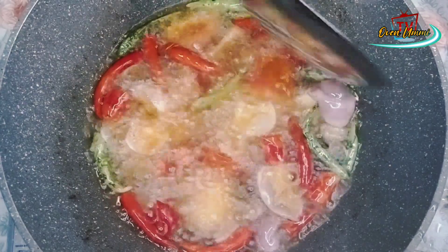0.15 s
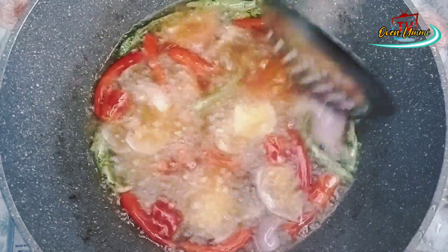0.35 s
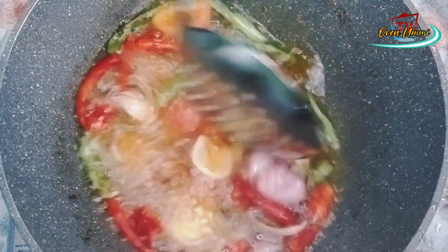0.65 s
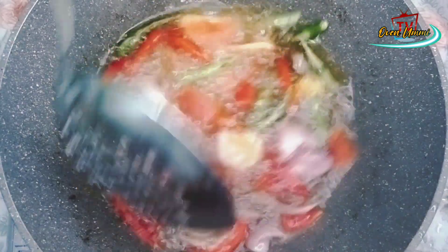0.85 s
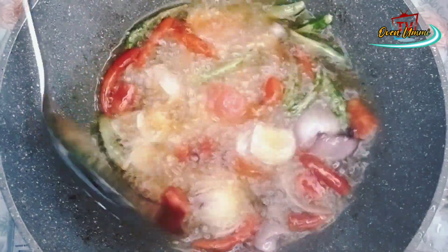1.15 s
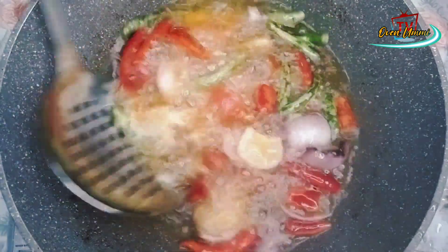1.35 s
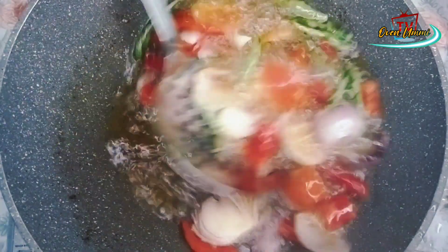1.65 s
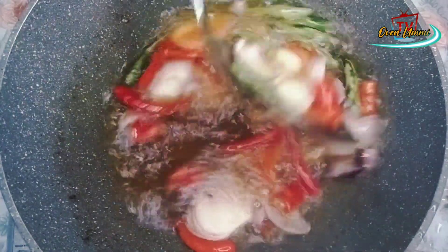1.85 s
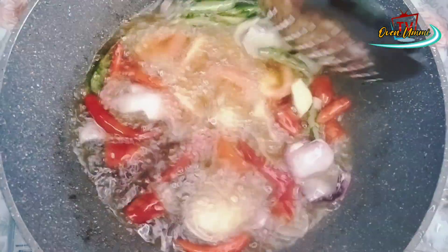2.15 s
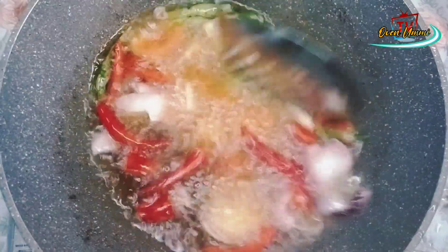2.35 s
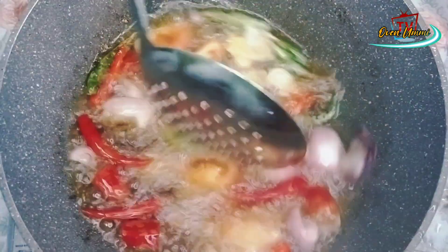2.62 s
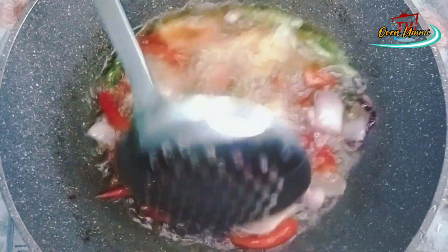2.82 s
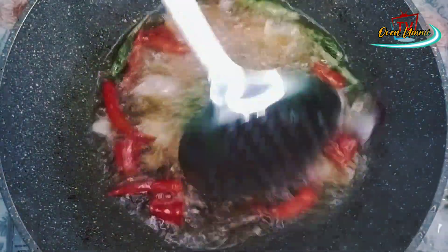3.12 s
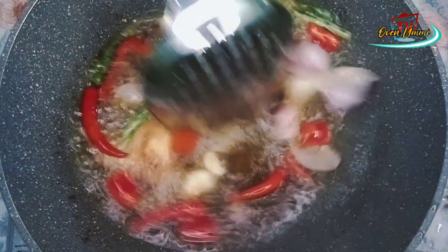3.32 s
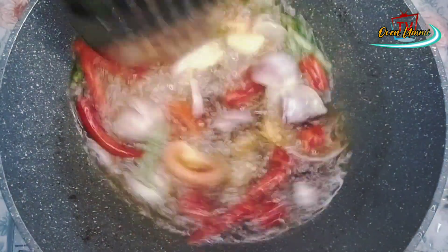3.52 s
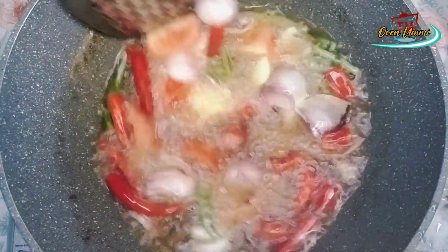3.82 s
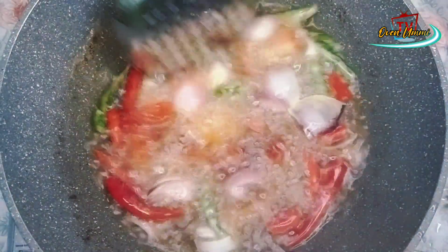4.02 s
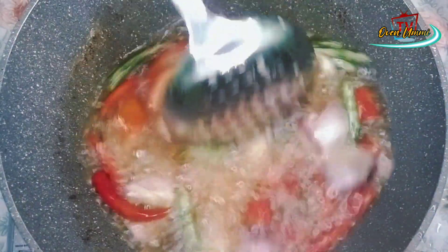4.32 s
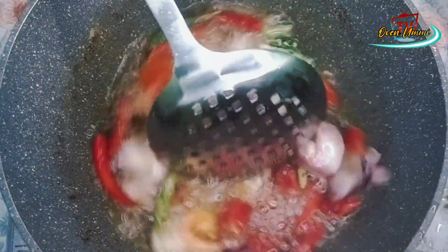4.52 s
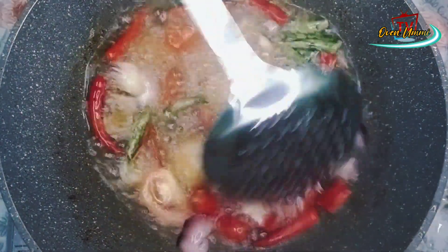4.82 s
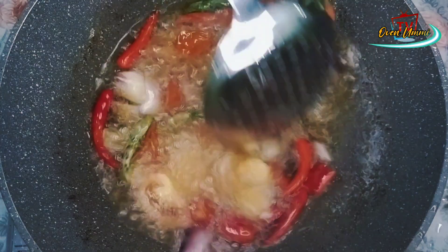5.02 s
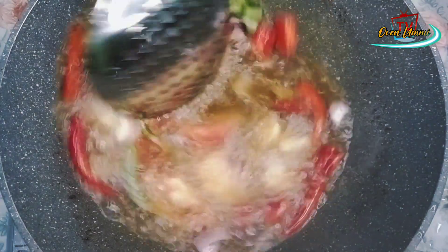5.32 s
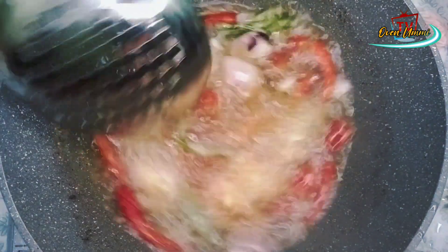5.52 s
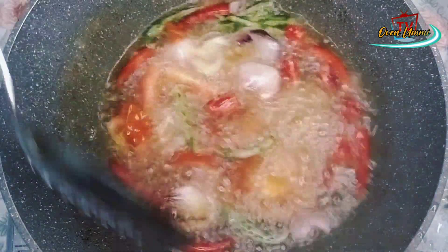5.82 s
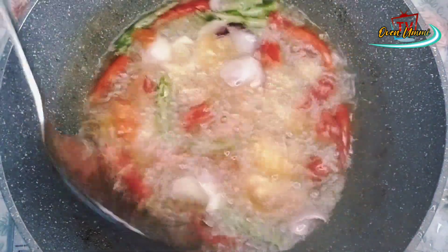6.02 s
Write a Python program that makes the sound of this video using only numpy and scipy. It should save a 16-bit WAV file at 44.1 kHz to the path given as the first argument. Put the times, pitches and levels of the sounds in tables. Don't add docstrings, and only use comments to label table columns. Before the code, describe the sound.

A phone held close over a wok hears frying oil as gated, watery crackle rather than a full steady hiss: tiny bright clicks, snappy bubble pops and lower plops, weaker in the first two seconds and denser later. A metal skimmer stirs, tapping and knocking with short dull rings, the brightest double knock just before four seconds, light tap and soft thud at the end.

```python
import sys
import numpy as np
from scipy import signal
from scipy.fft import rfft, irfft, next_fast_len
from scipy.io import wavfile
from scipy.ndimage import uniform_filter1d

SR = 44100
rng = np.random.default_rng(int(sys.argv[2]) if len(sys.argv) > 2 else 0)


def materialize(psi):
    bounded = np.clip(np.atleast_2d(psi).T, -1, 1)
    quanta = np.round(bounded * 32767).astype(np.int16)
    wavfile.write(sys.argv[1], SR, quanta)


N = 271656
FRAME, HOP = 768, 192
HELD_DOWN_DB = 23


def from_db(db):
    return 10 ** (np.asarray(db) / 20)


def rms_one(x):
    return x / np.sqrt(np.mean(x ** 2) + 1e-20)


def resonances(x, modes):
    out = 0
    for k, (hz, width, db) in enumerate(modes):
        r = np.exp(-np.pi * width / SR)
        poles = [1, -2 * r * np.cos(2 * np.pi * hz / SR), r * r]
        out = out + (-1) ** k * from_db(db) * signal.lfilter([1 - r, 0, r - 1], poles, x)
    return out


# f/Hz, density level/dB
STEADY_SPECTRUM = [(24, -54.5), (50, -33), (100, -20), (159, -2.5), (256, -7), (412, -9.5), (697, -1.5),
                   (1090, -5.5), (1500, -1.5), (2800, -12.5), (4340, -12), (7930, -9), (12000, -19.5),
                   (15600, -12.5)]


def steady_gain(hz):
    corner_hz, corner_db = np.array(STEADY_SPECTRUM).T

    def shape(f):
        return from_db(np.interp(np.log(f + 1), np.log(corner_hz), corner_db))

    whole = np.sqrt(np.mean(shape(np.linspace(0, SR / 2, 4000)) ** 2))
    steady_db = -67.5
    return shape(hz) / whole * from_db(steady_db + HELD_DOWN_DB + 0.5)


ECHO_PATHS = [.0113, .0149, .0191, .0237, .0293, .0371]


def kitchen(x):
    echo_db, t60_s = -17, 0.35
    size = next_fast_len(N + SR)
    turn = -2j * np.pi * np.fft.rfftfreq(size, 1 / SR)
    loops = [from_db(-60 * lag / t60_s) * np.exp(turn * lag) for lag in ECHO_PATHS]
    echoes = sum(g / (1 - g) for g in loops)
    return x + from_db(echo_db) * irfft(rfft(x, size) * echoes, size)[:N]


# t/s, fade/s, level/dB, f/Hz, width/Hz
SCRAPE_STROKE = (4, 0.47, -46.5, 1389, 277)


def scrape():
    s, fade, db, hz, width = SCRAPE_STROKE
    t = np.maximum(np.arange(N) / SR - s, 0)
    rub = rms_one(resonances(rng.standard_normal(N), [(hz, width, 0)]))
    return from_db(db) * rub * (t > 0) * np.exp(-(t / fade) ** 2)


# f/Hz, width/Hz, level/dB
ROOM_MODES = [(95.7, 8.3, 1.5), (151.8, 19, 2.5), (198, 46, -3.5)]
# f/Hz, width/Hz, level/dB
PAN_MODES = [(326, 58, -8), (520, 133, 1), (800, 146, 3), (1279, 500, -3), (1974, 270, -10)]
# t/s, ring level/dB, thud over ring/dB, boom over ring/dB, hardness/dB per octave
KNOCKS_ON_PAN = [
    (0.343, -36, 15, -2, 1.64),
    (1.252, -36.5, 22.5, -6, -3),
    (2.96, -43, 22, -2.5, -5.5),
    (3.818, -35.5, 1, -7.5, 3.5),
    (3.981, -38.5, 3, -0.5, -2),
    (5.911, -43.5, -1, 1, -0.5),
    (6.12, -43, 24, 1.5, -2.1),
]


def knocks():
    out, t = np.zeros(N + SR), np.arange(SR // 2) / SR
    bright = signal.butter(2, [1500, 3800], "band", fs=SR, output="sos")
    for s, db, thud_db, boom_db, hardness in KNOCKS_ON_PAN:
        air = rng.standard_normal((3, len(t)))
        struck = [(f, width, level + hardness * np.log2(f / 500)) for f, width, level in PAN_MODES]
        thud_hz = 562 - 8 * hardness
        thud = np.sin(2 * np.pi * thud_hz * t) * np.exp(-((t - 0.0025) / 0.0016) ** 2)
        ring_decay = 5.9 * np.exp(-t / 0.0053) + from_db(-60 * t / 0.88)
        ring = rms_one(resonances(air[0], struck)) * ring_decay * (1 - np.exp(-t / 0.0044))
        boom = rms_one(resonances(air[1], ROOM_MODES)) * from_db(-60 * t / 0.61) * (1 - np.exp(-t / 0.004))
        clack_decay = np.exp(-t / 0.0013) + 0.28 * from_db(-60 * t / 1.0)
        clack = rms_one(signal.sosfilt(bright, air[2])) * clack_decay
        clack_db = -4.5 + 2.6 * hardness
        blow = 1.05 * from_db(thud_db) * thud + ring + from_db(boom_db) * boom + from_db(clack_db) * clack
        i = round(s * SR)
        out[i:i + len(t)] += from_db(db) * blow
    return out[:N]


# t/s, level/dB, treble/dB
FRYING_VIGOUR = [(0.0, 6.5, 1), (0.199, -5.5, 0.5), (0.439, 0, -4), (0.66, -6.5, 2), (1.101, -1, -1.5),
                 (1.6, -6, 0), (2.1, 2.5, 1), (2.42, 2.5, 0.5), (2.64, -2.5, 0), (2.86, 3.5, 1),
                 (3.3, 5.5, -1.5), (3.701, 5.5, -0.5), (4.05, 5.5, 0), (4.38, 3.5, -1.5), (4.62, 5.5, 1.5),
                 (5.1, 5, 0), (5.3, 6, 0), (6.16, 8.5, -1)]


def vigour(s, column=1):
    rows = np.array(FRYING_VIGOUR)
    return np.interp(s, rows[:, 0], rows[:, column])


def crackle(per_s, spread_db):
    sizes = from_db(spread_db * np.minimum(rng.exponential(1, N), 5.0)) * rng.choice([-1, 1], N)
    return rms_one(sizes * (rng.random(N) < per_s / SR))


def bubbles(per_s, cycles):
    born = crackle(per_s, spread_db=3.0)
    dealt = rng.integers(0, 24, N)
    total = 0
    for k, hz in enumerate(np.geomspace(2200, 15000, 24)):
        excitation = born * (dealt == k) + 1e-18
        total = total + resonances(excitation, [(hz, hz / cycles, 0)]) / np.sqrt(hz)
    return rms_one(total)


FIZZ_REGIONS = [1610, 3640, 7260, 12140]
# lift/dB, share of the vigour, warming/dB per s
FIZZ_RESPONSE = [(0, 0.089, 0), (2.5, 0.18, 0.76), (0.29, .9, -0.03), (0.55, 0.94, -0.0038)]
# f/Hz, width/Hz, share of the vigour added
BOWL_MODES = [(2546, 330, 0.4), (3220, 260, -0.16), (3756, 100, 0.18), (4980, 210, 0.14),
              (5360, 400, -0.27), (5825, 43, -0.44), (8500, 860, 0.034)]


def sizzle(click_share):
    clicks = crackle(1200, spread_db=3.0)
    clicks = signal.sosfilt(signal.butter(1, 1200, "high", fs=SR, output="sos"), clicks)
    hiss = np.sqrt(1 - click_share) * rng.standard_normal(N)
    flat = hiss + np.sqrt(click_share) * clicks + from_db(-9.0) * bubbles(1600, cycles=6.0)
    hz, s, spec = signal.stft(flat, SR, nperseg=FRAME, noverlap=FRAME - HOP)
    bowl = 1 + sum(share * np.exp(-((hz - centre) / width) ** 2) for centre, width, share in BOWL_MODES)
    lift = np.array([db + follows * vigour(s) + warming * s for db, follows, warming in FIZZ_RESPONSE])
    lift[-1] += vigour(s, column=-1)
    weights = np.array([np.interp(hz, FIZZ_REGIONS, row) for row in np.eye(4)])
    lifted = spec * from_db(bowl[:, None] * (weights.T @ lift))
    return signal.istft(lifted, SR, nperseg=FRAME, noverlap=FRAME - HOP)[1][:N]


def spatter():
    count, follows = 140, 2.2
    s = np.arange(N) / SR
    share = np.cumsum(from_db(follows * vigour(s)))
    when, size, pitch, broad = rng.random((count, 4)).T
    t = np.interp(when, share / share[-1], s)
    hz = 3500 + (15510 - 3500) * pitch
    spread_hz = 79 * (900 / 79) ** broad
    return list(zip(t, 16.5 + 3 * size, hz, spread_hz))


# t/s, level over sizzle/dB, f/Hz, spread/Hz
BROAD_POPS = [(0.117, 22, 5570, 3310), (0.288, 24.5, 10100, 3040), (2.909, 17.5, 13930, 2600),
              (0.42, 31, 3160, 890), (0.69, 18.5, 10300, 2600), (0.691, 20.5, 14000, 2200),
              (0.832, 18.5, 7330, 1820), (0.915, 16.5, 13750, 1980), (1.004, 17, 11400, 2160),
              (1.005, 17.5, 15100, 1410), (1.144, 17.5, 9350, 1352), (1.253, 25, 2610, 4730),
              (1.975, 18.5, 12270, 3209), (2.019, 18.5, 7490, 2235), (2.142, 22.5, 5965, 2460),
              (2.3, 18.5, 12200, 3540), (2.338, 19, 5920, 1256), (2.377, 19, 10250, 1695),
              (2.491, 19, 9760, 2530), (2.79, 19, 7500, 1500), (2.795, 18.5, 12670, 2967),
              (3.143, 19, 12790, 5290), (3.158, 21, 4970, 2290), (3.634, 26.5, 13800, 5150),
              (3.725, 30, 5010, 880), (3.819, 23.5, 6840, 4900), (3.964, 18.5, 10700, 3160),
              (5.234, 22.5, 11770, 7350), (5.313, 23, 11570, 7500), (5.905, 24.5, 6314, 2400)]
# t/s, level over sizzle/dB, f/Hz
SINGLE_POPS = [(0.042, 20, 3350), (0.07, 23, 4840), (0.336, 26.5, 3925), (0.471, 19.5, 7820),
               (0.487, 18.5, 8270), (0.62, 19, 4500), (0.973, 18, 10300), (1.211, 20, 6470),
               (1.276, 20, 14300), (1.465, 25, 3940), (1.5, 25.5, 4060), (1.505, 22, 8150),
               (1.536, 21, 2430), (1.804, 18.5, 15000), (1.814, 22, 6980), (1.924, 23.5, 3956),
               (2.055, 20, 7560), (2.439, 27, 6810), (2.544, 19.5, 14040), (2.687, 17, 12940),
               (2.981, 19.5, 4530), (3.044, 28, 5240), (3.294, 28.5, 5040), (3.434, 31, 4570),
               (3.524, 18.5, 7400), (3.923, 33, 3190), (4.205, 25, 4488), (5.122, 26.5, 3840),
               (5.499, 33.5, 4980), (5.955, 31.5, 8060)]
# t/s, level over sizzle/dB, f/Hz
LOW_POPS = [(1.215, 18, 3230), (1.516, 23, 3330), (5.27, 27.5, 3030), (3.194, 24.5, 3635),
            (3.758, 24.5, 3435), (4.016, 27.5, 3500), (4.283, 27.5, 2760), (4.522, 21, 2670),
            (4.544, 13.5, 3650), (4.832, 22, 2425), (5.02, 22, 2630), (5.33, 27, 2580), (5.744, 20, 2716),
            (5.917, 24, 2930), (5.957, 21.5, 2035)]
# t/s, level over sizzle/dB, f/Hz
SKIMMER_TAPS = [(0.346, 30.5, 1490), (1.064, 20.5, 527), (1.253, 34.5, 1086), (1.68, 18, 492),
                (1.688, 19, 2027), (2.692, 22.5, 815), (2.692, 19.5, 1054), (3.824, 29.5, 2147),
                (4.086, 22.5, 2028), (4.166, 22.5, 1356), (4.321, 19.5, 635), (3.819, 36, 773),
                (3.981, 30, 920), (4.913, 19.5, 797), (5.353, 17.5, 660), (4.321, 17.5, 1078),
                (0.404, 21, 2074)]


def pops(decay_s, offset_db):
    length = 600
    out, t = np.zeros(N + length), np.arange(length) / SR
    bursts = list(BROAD_POPS)
    bursts += [(s, db, hz, 440) for s, db, hz in SINGLE_POPS]
    bursts += [(s, db, hz, 170) for s, db, hz in LOW_POPS]
    bursts += [(s, db, hz, 0.15 * hz) for s, db, hz in SKIMMER_TAPS]
    bursts += spatter()
    chance = rng.random((len(bursts), 3, 16))
    for (s, db, hz, spread), (place, phase, size) in zip(bursts, chance):
        fade = decay_s * np.clip(350 / spread, 0.4, 1) + 1.67 / hz
        count = int(np.clip(spread / 450 + 1, 1, 16))
        pitch = hz + spread * ((np.arange(count) + 0.23 + 0.58 * place[:count]) / count - 0.5)
        tones = np.sin(2 * np.pi * pitch[:, None] * t + phase[:count, None])
        rings = (from_db(4.71 * (size[:count, None] - 1.5)) * tones).sum(0)
        envelope = (1 - np.exp(-t / 0.00025)) * np.exp(-t / fade) * decay_s / fade
        i = round(s * SR)
        out[i:i + length] += from_db(db + offset_db) * rings * envelope
    return out[:N]


def oil():
    flat = sizzle(click_share=0.41) + kitchen(pops(decay_s=0.0017, offset_db=-5.0))
    size = next_fast_len(N)
    return irfft(rfft(flat, size) * steady_gain(np.fft.rfftfreq(size, 1 / SR)), size)[:N]


def scene():
    return (oil() + knocks() + scrape())[None]


def suppressor(x, open_db, slope, release_db_s, memory_db):
    hz, s, spec = signal.stft(x, SR, nperseg=FRAME, noverlap=FRAME - HOP)
    learnt = steady_gain(hz)[:, None] ** 2 * 1.5 / FRAME + 1e-12
    excess = uniform_filter1d(np.abs(spec) ** 2 / learnt, size=2, axis=0)
    over_db = 10 * np.log10(excess + 1e-9)
    held, now = np.zeros(spec.shape), np.zeros(len(hz))
    for k in range(len(s)):
        wanted = slope * (over_db[:, k] - open_db + memory_db * now / HELD_DOWN_DB)
        now = np.clip(np.maximum(wanted, now - release_db_s * HOP / SR), 0, HELD_DOWN_DB)
        held[:, k] = now
    early = uniform_filter1d(held, size=3, axis=1, origin=-1)
    gated = spec * from_db(early - HELD_DOWN_DB)
    return signal.istft(gated, SR, nperseg=FRAME, noverlap=FRAME - HOP)[1][:N]


def roll_off(x):
    return signal.sosfilt(signal.butter(12, 16810, fs=SR, output="sos"), x)


def record(dry):
    clean = suppressor(dry[0], open_db=9.0, slope=3.466, release_db_s=149, memory_db=5.0)
    band_limit = signal.ellip(10, 0.5, 32, 15650, fs=SR, output="sos")
    clean = signal.sosfilt(band_limit, clean)
    return roll_off(clean[None])


dry = scene()
out = record(dry)
materialize(out)
```